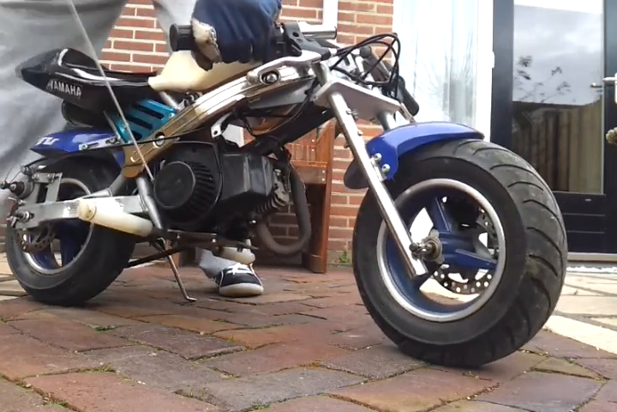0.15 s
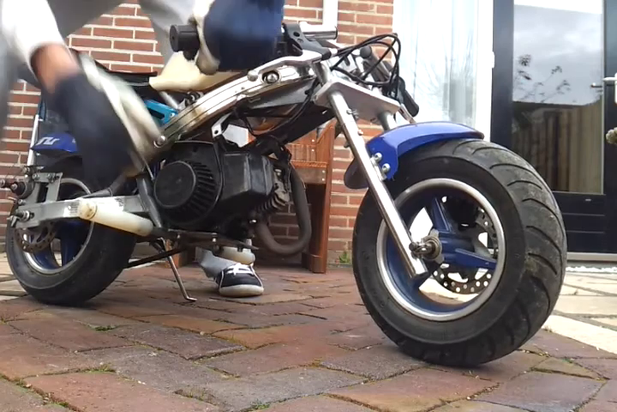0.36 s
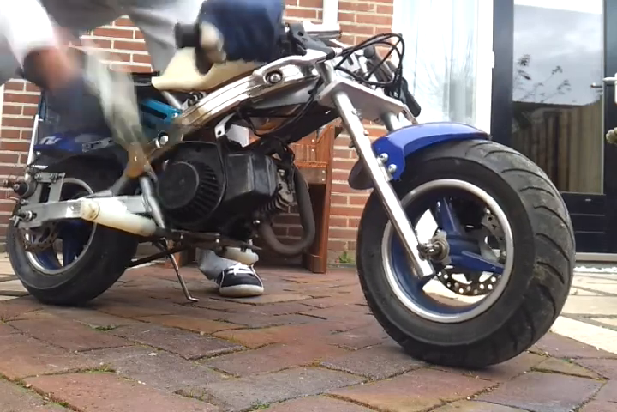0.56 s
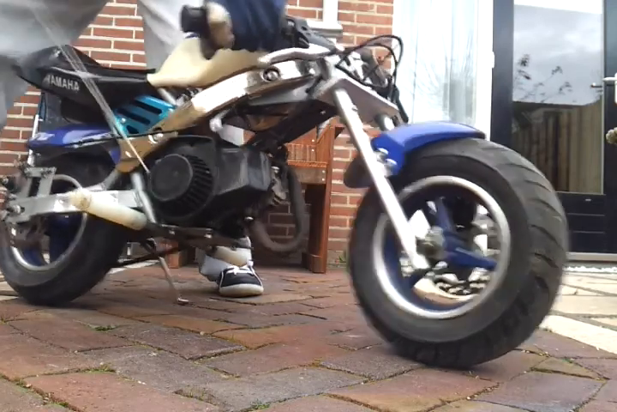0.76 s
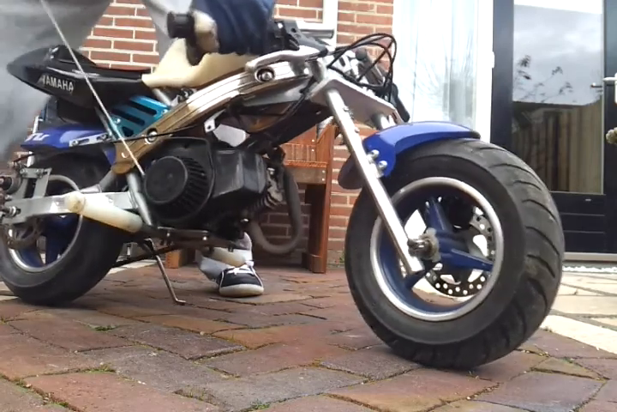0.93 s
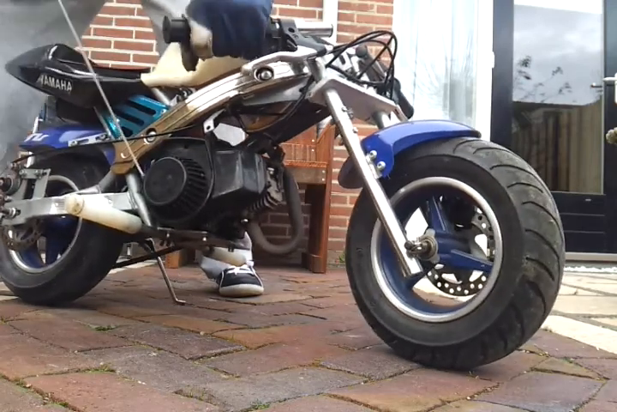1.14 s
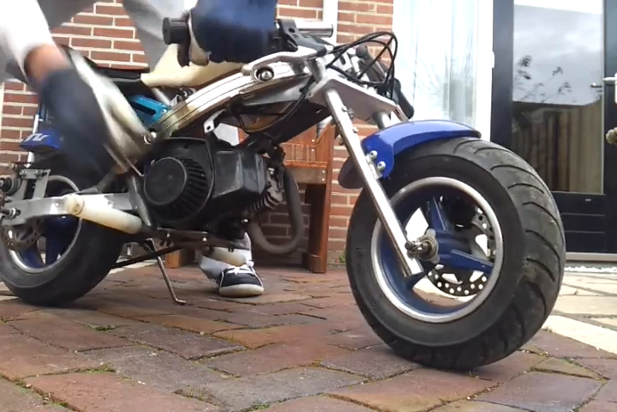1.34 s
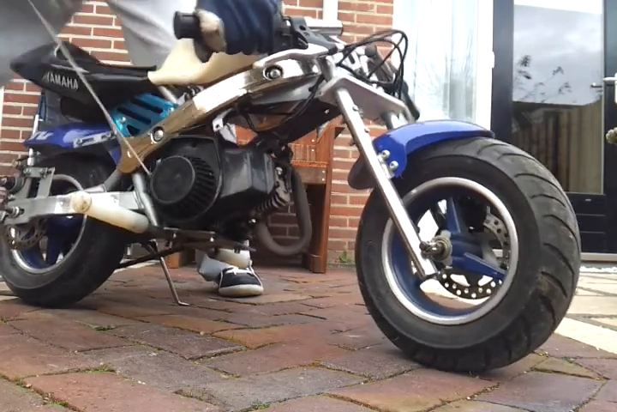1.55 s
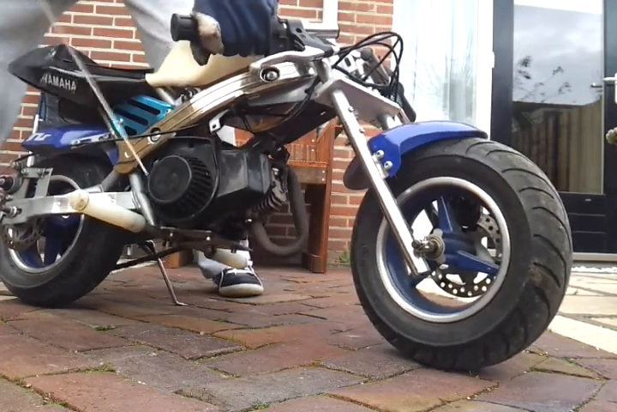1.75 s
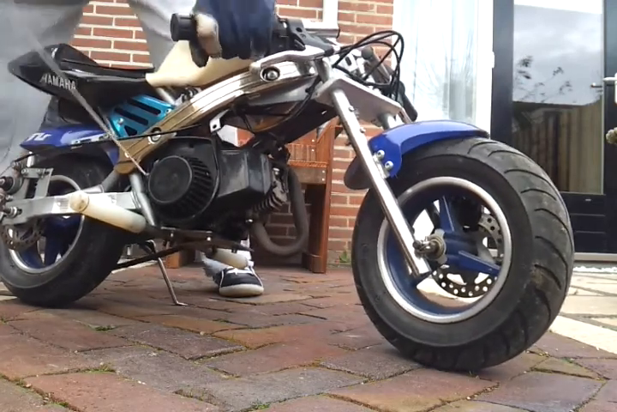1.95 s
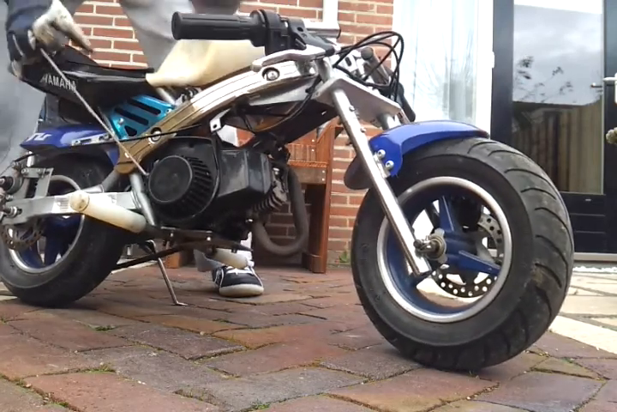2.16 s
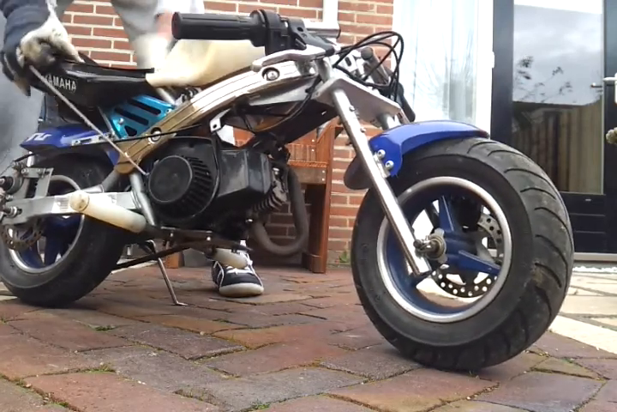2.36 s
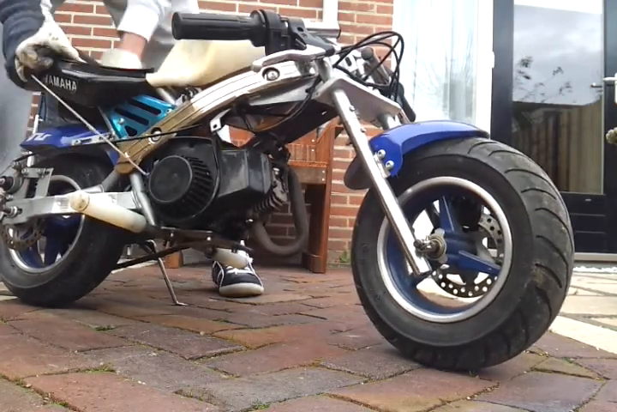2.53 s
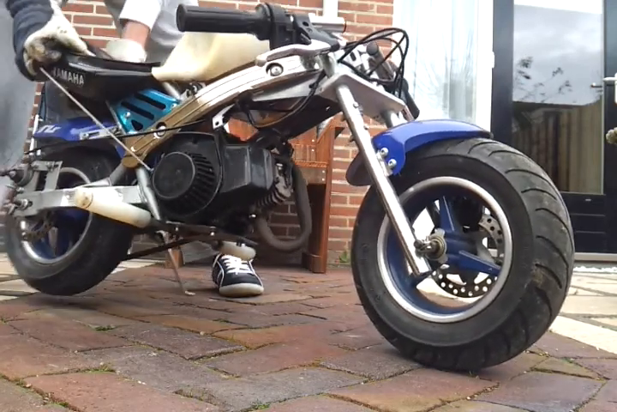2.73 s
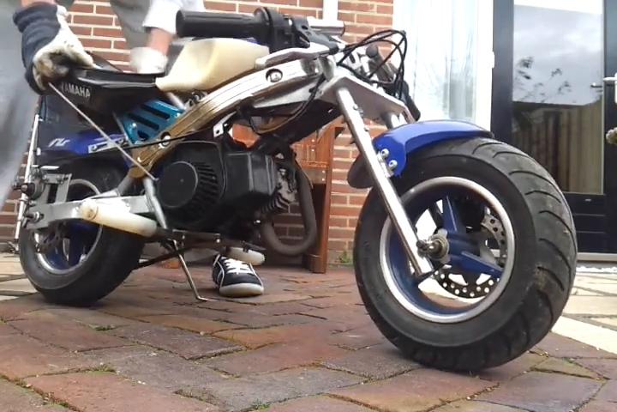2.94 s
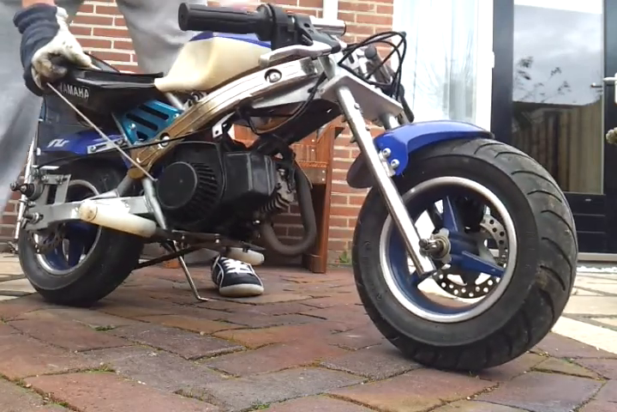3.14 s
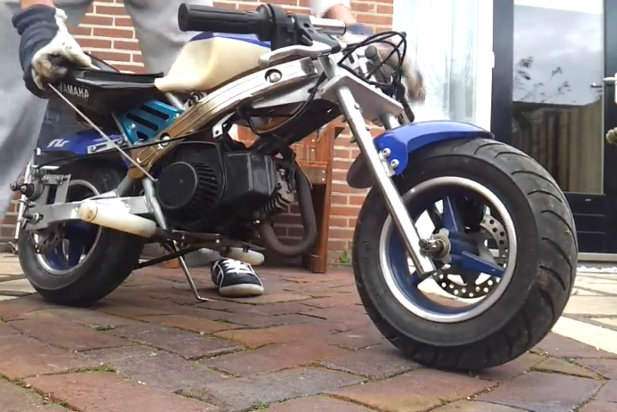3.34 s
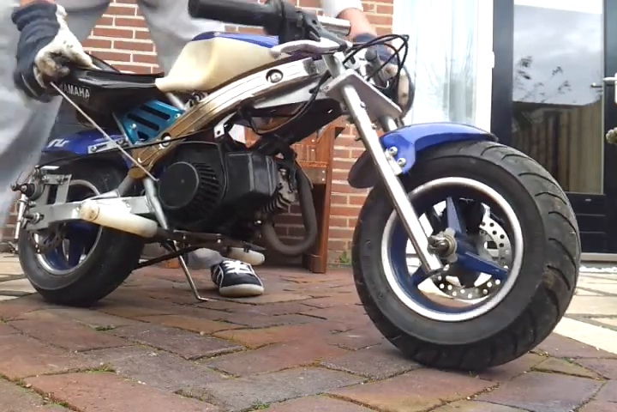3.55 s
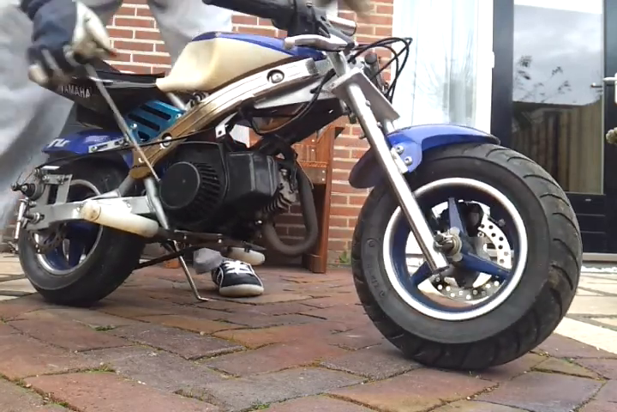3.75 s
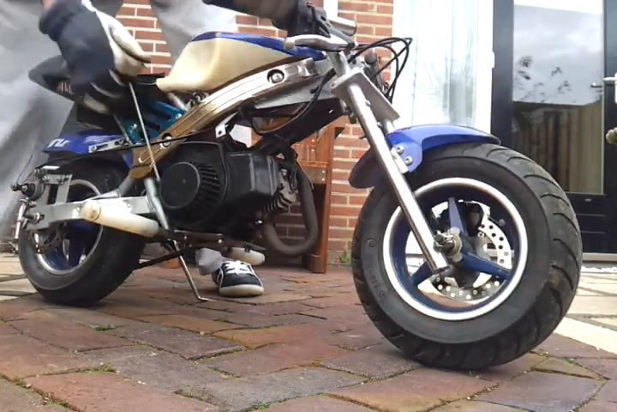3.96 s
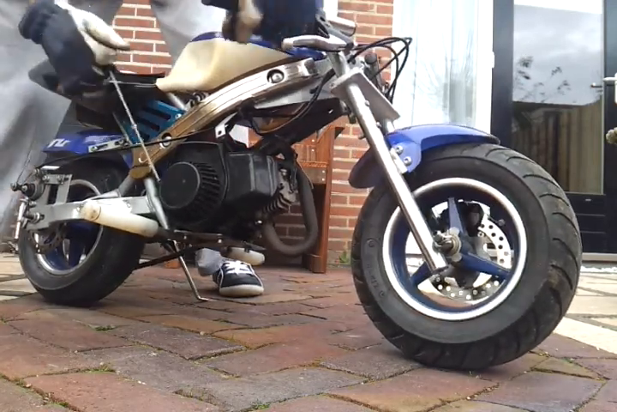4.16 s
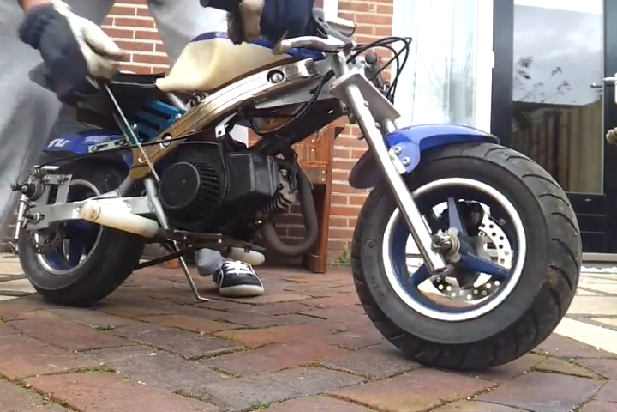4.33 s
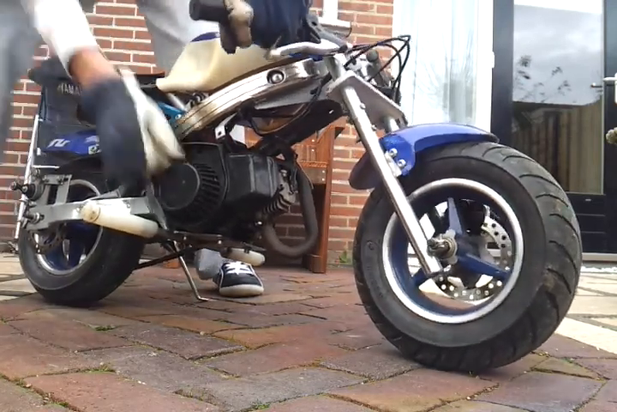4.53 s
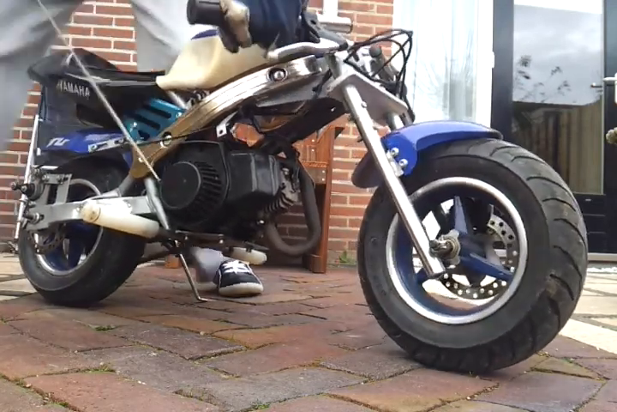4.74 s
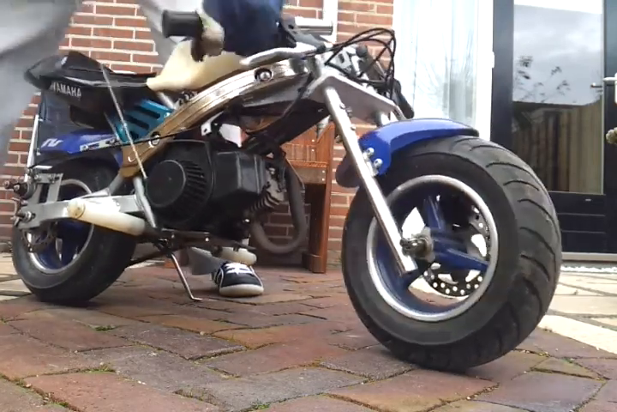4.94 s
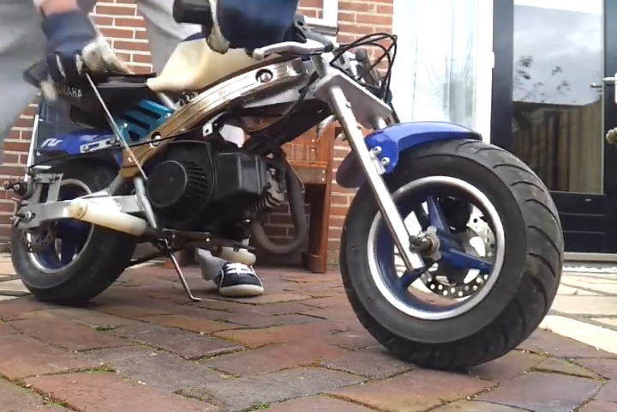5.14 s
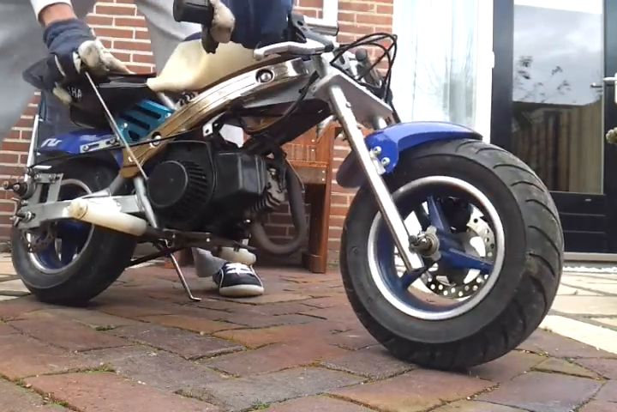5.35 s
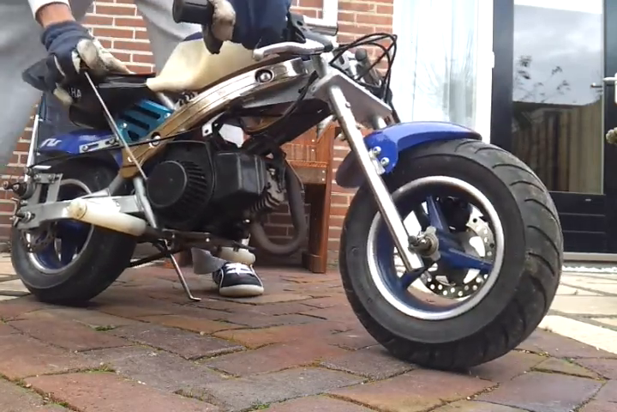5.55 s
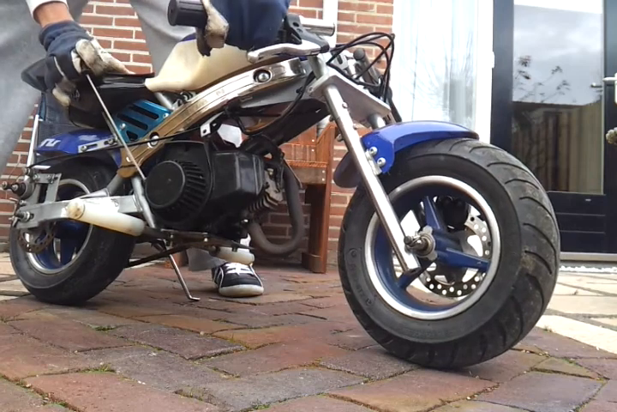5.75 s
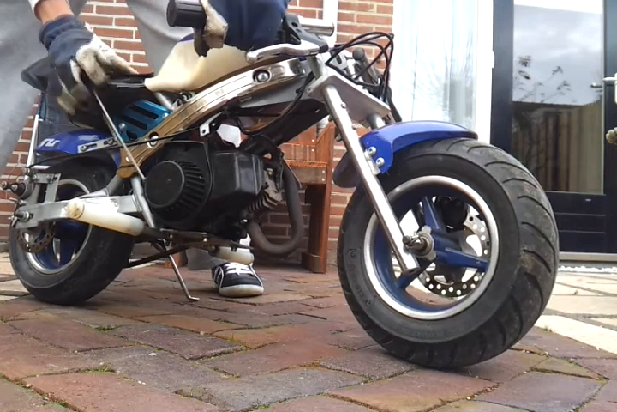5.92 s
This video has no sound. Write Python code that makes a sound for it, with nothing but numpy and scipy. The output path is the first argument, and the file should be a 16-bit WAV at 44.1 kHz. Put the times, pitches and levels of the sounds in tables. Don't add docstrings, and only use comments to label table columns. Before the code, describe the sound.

A small camera microphone sits about a metre from a tiny two-stroke motorbike on a brick patio, with short wall echoes and faint town hum. At 0 s a starter pull is already ending: hollow exhaust puffs slow and die by 0.26 s, with casing ticks and a rubbing whirr. Plastic and ratchet clacks follow around 0.45-0.65 s. A second, stronger pull runs 0.65-1.1 s, about thirty chuffs a second, with raspy whirr and thin squeaks, then a clack at 1.22 s. Handle clacks at 1.45 s lead to a third pull, 1.55-2.0 s, slowing out. From 2.1 to 4.4 s it is quiet: light taps, glove rubs, a sharper panel knock at 2.74 s and small puffs of wind near 3.2 s. Clicks gather from 4.4 s; at 4.7 s pawls snap and squeak and the engine catches, loud, ragged and distorted, briefly coasting lower around 5.15-5.5 s, then firing again, buzzing to the cut at 6 s.

```python
import sys
import numpy as np
from scipy import signal
from scipy.fft import rfft, irfft, next_fast_len
from scipy.io import wavfile
from scipy.ndimage import uniform_filter1d

SR = 44100
rng = np.random.default_rng(int(sys.argv[2]) if len(sys.argv) > 2 else 0)


def log_audio(samples):
    frames = np.atleast_2d(samples).T
    limited = np.clip(frames, -1, 1)
    pcm = np.round(limited * 32767).astype(np.int16)
    wavfile.write(sys.argv[1], SR, pcm)


def level_to_linear(level):
    exponent = np.asarray(level, float) / 20
    return 10 ** exponent


N = 264159
T = np.arange(N) / SR

# (time [s], frequency [Hz], level [dB])
INTAKE = [(4.75, 530, -8), (5.1, 500, -6), (5.16, 468, 4), (5.23, 440, 0), (5.27, 450, -6), (5.315, 455, 3),
          (5.36, 350, -1), (5.45, 275, 2), (5.52, 260, 1), (5.58, 280, -4), (5.85, 280, -4), (6, 275, -6)]


def evened(x):
    return x / np.sqrt(np.mean(x ** 2) + 1e-20)


def coloured(x, points):
    f, db = np.transpose(points)
    size = next_fast_len(len(x))
    hz = np.fft.rfftfreq(size, 1 / SR)
    gain = level_to_linear(np.interp(np.log(hz + 1), np.log(f), db))
    return irfft(rfft(x, size) * gain, size)[:len(x)]


def ring(x, modes):
    out = 0
    for hz, width_hz, db in modes:
        pole = np.exp((2j * np.pi * hz - np.pi * width_hz) / SR)
        out = out + level_to_linear(db) * signal.lfilter([1], [1, -pole], x).imag
    return out


def sweep(x, hz, width_hz):
    turn = np.exp(2j * np.pi * np.cumsum(hz) / SR)
    return (turn * signal.lfilter([1], [1, -np.exp(-np.pi * width_hz / SR)], x / turn)).imag


def add(mix, s, sound):
    part = mix[max(round(s * SR), 0):][:len(sound)]
    part += sound[:len(part)]


def clicks(times, db):
    at = np.clip(np.round(np.asarray(times) * SR).astype(int), 0, N - 1)
    return np.bincount(at, level_to_linear(db), N)


def soft(x, width_s):
    push = np.hanning(int(width_s * SR) + 3)
    return signal.oaconvolve(x, push / push.sum())[:len(x)]


def fading_noise(hits, decay_s):
    return signal.lfilter([1], [1, -np.exp(-1 / (decay_s * SR))], hits) * rng.standard_normal(N)


def curve(points):
    return level_to_linear(np.interp(T, *np.transpose(points), left=-120))


def gesture(start, stop, rise_s, fall_db_per_s):
    return np.clip((T - start) / rise_s, 0, 1) ** 2 * level_to_linear(-fall_db_per_s * np.maximum(T - stop, 0))


def pipe(flow, modes, low_hz=110):
    return signal.sosfilt(signal.butter(3, low_hz, "high", fs=SR, output="sos"), ring(flow, modes))


def cranking():
    # (time [s], level [dB])
    strokes = [(0.002, -5.5), (0.053, -7.5), (0.117, -13), (0.167, -19.5), (0.2099, -23), (0.258, -43),
               (0.7082, 2), (0.74, -2.5), (0.768, -1.5), (0.798, -1), (0.8283, -3.5), (0.856, -2),
               (0.898, -1), (0.947, -8), (1.011, -7.5), (1.047, -28), (1.09, -16), (1.108, -24.5),
               (1.593, -20), (1.616, -2), (1.645, -1), (1.678, 0.5), (1.711, -2), (1.749, -3.5),
               (1.796, -4.5), (1.851, -6.5), (1.867, -17), (1.929, -11.5), (1.991, -34), (2.063, -49)]
    # (frequency [Hz], width [Hz], level [dB])
    pipe_modes = [(140, 64, -19), (262.3, 67, -0.5), (367, 41, -9.5), (480, 35, -5.5), (537, 26, -8.5),
                  (770, 51, -6.5), (940, 55, -11.5), (1364, 86, -3)]
    # (time [s], level [dB])
    pings = [(.004, -14.5), (0.051, -15), (.199, -21.5), (0.7147, -15.5), (0.7467, -11.5), (0.779, -10.5),
             (0.806, -11.5), (0.9057, -3.5), (0.9553, -11), (1.625, -5.5), (1.654, -15), (1.685, -22),
             (1.7202, -14), (1.759, -15), (1.8084, -10), (1.866, -14.5), (1.021, -19), (1.109, -36),
             (1.943, -24)]
    # (frequency [Hz], width [Hz], level [dB])
    cold_can = [(2520, 170, 2), (1380, 200, 0), (2230, 150, -5), (900, 200, -4)]
    port_lag_s = 0.00097
    rebound_s, rebound_db = 0.01092, -16
    s, db = np.transpose(strokes)
    puffs = fading_noise(clicks(s, db - 11), 0.021)
    slugs = soft(clicks(s + port_lag_s, db) + clicks(s + rebound_s, db + rebound_db), 0.0027)
    blown = -pipe(-slugs + 0.081 * soft(puffs, 0.00038), pipe_modes, low_hz=165)
    sigh = soft(clicks(s, -13.5 + 0.32 * db), 0.0059)
    taps = np.diff(soft(clicks(*np.transpose(pings)), .0003), prepend=0)
    return blown + 3 * pipe(sigh, pipe_modes) + level_to_linear(10.5) * ring(taps, cold_can)


def crank():
    # (time [s], gain [turns/s])
    kicks = [(4.72, 80), (4.76, 8), (4.8, 10), (4.84, 12), (4.883, 5.5), (4.927, 3), (5.009, 8), (5.05, 8),
             (5.122, 3), (5.198, 3), (5.267, 13), (5.404, 11), (5.523, 3), (5.592, 9), (5.662, 8),
             (5.751, 13.5), (5.836, 9), (5.905, 9), (5.975, 9)]
    drag_turns_per_s2 = 130
    s, kick = np.transpose(kicks)
    speed = np.cumsum(np.bincount((s * SR).astype(int), kick, N))
    speed = speed - drag_turns_per_s2 * np.maximum(T - s[0], 0)
    return np.cumsum(speed) / SR, speed


def engine():
    # (time [s], level [dB])
    pumping = [(4.735, -49.5), (4.76, -7), (4.9, -5.5), (5.1, -4), (5.3, -5.5), (5.5, -4.5), (5.7, -6.5),
               (6, -2)]
    # (frequency [Hz], width [Hz], level [dB])
    fast_pipe = [(373, 650, 7), (277.7, 56, -6.5), (479, 56, -9), (535, 41, -6), (983, 250, -26.5),
                 (1390, 100, -10)]
    turns, speed = crank()
    level = curve(pumping)
    uneven = level_to_linear(2 * rng.standard_normal(N)) * level
    beat = (np.diff(np.floor(turns), prepend=0) > 0) * uneven
    gulp = (np.diff(np.floor(turns + .47), prepend=0) > 0) * uneven
    gas = level * (1.0 + np.exp(-(turns % 1) / 0.93)) * rng.standard_normal(N)
    flow = -soft(beat + 0.096 * gulp, 0.00082) + .016 * soft(gas, 0.00046)
    exhaust = pipe(flow, fast_pipe, low_hz=189)
    return exhaust + firings(gas) + intake(level * (gulp != 0)) + cylinder(beat, gas) + drone(turns, speed)


def firings(gas):
    # (time [s], can ping level [dB], pipe ring level [dB])
    lit = [(4.7611, -0.5, -19.5), (4.7994, -14, -10.5), (4.8384, -8.5, -12), (4.8818, -6, 8.5),
           (4.9267, -5.5, -10), (4.9716, -5.5, -17), (5.009, -4, -3.5), (5.0499, -16.5, -3.5),
           (5.099, -22, -8), (5.1218, -8, -8), (5.142, -10, -16), (5.1976, -11.5, -12.5), (5.2669, -1, -3),
           (5.3328, -17.5, -16.5), (5.4041, -2, -3.5), (5.5233, 1, -9.5), (5.5917, 1, -17.5),
           (5.662, -6, -9.5), (5.7089, -10.5, -16.5), (5.7508, -7.5, -5.5), (5.84, -2, -12.5),
           (5.9045, -9.5, -6.5), (5.9738, -3.5, -15)]
    # (frequency [Hz], width [Hz], level [dB])
    hot_pipe = [(745, 46.8, -15.5)]
    # (time [s], level [dB])
    header_rings = [(4.855, -16), (4.895, -12.5), (5.045, -17), (5.2, -16.5), (5.365, -38), (5.45, -19),
                    (5.535, -15), (5.63, -13), (5.685, -14.5), (5.718, -9.5), (5.87, -14), (5.935, -17),
                    (5.965, -23.5)]
    # (frequency [Hz], width [Hz], level [dB])
    header = [(544.2, 48, -14)]
    # (frequency [Hz], width [Hz], level [dB])
    can = [(2559, 64, -3), (2266, 170, 0.5)]
    s, ping_db, ring_db = np.transpose(lit)
    flame = fading_noise(clicks(s, ring_db), 0.0023)
    push = clicks(s, np.minimum(ring_db, -6) - 0.5) + .006 * flame + 0.003 * gas
    hot = ring(ring(push, hot_pipe), hot_pipe)
    bend = ring(ring(clicks(*np.transpose(header_rings)), header), header)
    rasp = fading_noise(clicks(s, ping_db), .009)
    return hot + bend + ring(clicks(s, ping_db + 4.5) + 0.077 * rasp, can)


def intake(gulps):
    s, hz, db = np.transpose(INTAKE)
    gulps = soft(gulps, 0.00021)
    gulps = gulps - uniform_filter1d(gulps, size=301)
    return level_to_linear(np.interp(T, s, db - 2.5)) * sweep(gulps, np.interp(T, s, hz), 120)


def cylinder(beat, gas):
    # (frequency [Hz], width [Hz], level [dB])
    fins = [(5940, 60, -7.5), (6230, 34, 3), (6290, 80, 0.5), (6550, 50, -0.5), (3900, 43, -8)]
    # (time [s], level [dB])
    skirt = [
        (4.75, -15),
        (5.05, -11),
        (5.15, -3),
        (5.5, -3),
        (5.6, -7),
        (5.85, -4),
        (6, -8),
    ]
    # (frequency [Hz], width [Hz], level [dB])
    bore = [(5290, 120, 0), (6200, 200, -5)]
    shaken = ring(level_to_linear(-23.5) * gas * 0.043 + level_to_linear(-9.5) * beat, fins)
    return shaken + ring(curve(skirt) * (beat != 0), bore)


def drone(turns, speed):
    # (time [s], level [dB])
    strength = [
        (4.74, -57),
        (4.8, -20),
        (5.05, -25.5),
        (5.15, -16.5),
        (5.5, -21.5),
        (5.58, -20),
        (6, -23),
    ]
    # (multiple of shaft speed, level [dB])
    orders_db = [(2, -14.5), (3, -1), (4, -1.5), (5, -2), (6, -1.5), (7, -3.5), (8, -3.5)]
    pick_hz, patchy_db, patch_s = 42, 2.5, .05
    s, hz, db = np.transpose(INTAKE)
    note_hz, lift_db = np.interp(T, s, hz), np.interp(T, s, db + 7)
    out = np.zeros(N)
    for k, order_db in orders_db:
        lift = lift_db / (1 + ((k * speed - note_hz) / pick_hz) ** 2)
        patchy = patchy_db * evened(soft(rng.standard_normal(N), patch_s))
        out += level_to_linear(order_db + lift + patchy) * np.cos(2 * np.pi * (k * turns + rng.random()))
    return curve(strength) * out


def effort():
    # (time [s], hiss level [dB])
    fan = [
        (4.655, -32),
        (4.7, -19.5),
        (4.78, -4),
        (4.95, -5.5),
        (6, -11),
    ]
    # (pawls grab [s], rope let go [s], hiss level [dB])
    pulls = [
        (-.3, -0.021, -12),
        (0.653, 0.943, -13.5),
        (1.547, 1.795, -15),
    ]
    # (start [s], hold [s], hiss level [dB], casing rattle re hiss [dB])
    rubs = [(0.147, 0.13, -39.5, -9), (0.288, 0.74, -46, -4), (0.457, 0.031, -33.5, -5),
            (0.621, 0.031, -26.5, -0.5), (1.189, 0.76, -45.5, -2), (1.205, 0.014, -52, 20.5),
            (1.442, 0.22, -33.5, -1), (2.044, 0.072, -55.5, 14.5), (2.165, 0.38, -56.5, -18),
            (2.605, .012, -48.5, 3.5), (2.683, 0.1, -53, 11.5), (2.733, 0.012, -25, -21),
            (2.815, 0.09, -70.5, 21), (2.944, 0.047, -35, 1.5), (2.988, 0.11, -60, 14.5),
            (3.445, 0.022, -46, -21), (3.649, 0.12, -53.5, 1.5), (4.12, 0.2, -58.5, 6.5),
            (4.407, 0.041, -61, 19), (4.467, 0.087, -58, -12), (4.552, 0.11, -50, -4),
            (4.595, 0.038, -56, 9)]
    grab_s, sag_db_per_s, let_go_db_per_s = 0.0024, 5.5, 484
    coast_db, coast_db_per_s, coast_s = -14, 62, 0.24
    rub_rise_s, rub_fall_db_per_s = 0.0084, 260.5
    hiss = curve(fan)
    rattle = hiss * level_to_linear(-6.5)
    for grab, go, db in pulls:
        pull = level_to_linear(db - sag_db_per_s * (T - grab)) * gesture(grab, go, grab_s, let_go_db_per_s)
        coast = level_to_linear(db + coast_db) * gesture(go, go, grab_s, coast_db_per_s)
        coast = coast * gesture(go, go + coast_s, grab_s, rub_fall_db_per_s)
        built = level_to_linear(-6.5 - 14.5 * np.exp(-np.maximum(T - grab, 0) / 0.023))
        hiss = hiss + pull + coast
        rattle = rattle + built * pull + level_to_linear(1) * coast
    for s, hold, db, rattle_db in rubs:
        rub = level_to_linear(db) * gesture(s, s + hold, rub_rise_s, rub_fall_db_per_s)
        hiss, rattle = hiss + rub, rattle + level_to_linear(rattle_db) * rub
    return hiss, rattle


def whirr():
    # (frequency [Hz], density [dB/Hz])
    hiss_colour = [(880, -17.5), (1500, -1.5), (1960, -6.5), (2400, -3.5), (2550, -3), (3130, -6),
                   (4870, -5), (5600, 0), (6260, 2.5), (7100, -9), (8000, 5), (10400, -73.5), (17600, -120)]
    rattle_colour = [(200, -4.5), (450, 0.0), (1000, 0), (2000, -9.5), (3000, -12.0)]
    hiss_gain, rattle_gain = effort()
    grains_per_s = 2500
    height = level_to_linear(2.0 * np.minimum(rng.exponential(1, N), 4))
    grains = height * (rng.random(N) < grains_per_s / SR) * rng.standard_normal(N)
    flicker = level_to_linear(2.14 * evened(soft(rng.standard_normal(N), 0.011)))
    scrape = (evened(grains) + 0.89 * rng.standard_normal(N)) * flicker
    hiss = evened(coloured(scrape, [(900, -47.0)] + hiss_colour))
    rattle = evened(coloured(rng.standard_normal(N) * flicker, rattle_colour))
    return level_to_linear(-0.5) * hiss_gain * hiss + level_to_linear(2.0) * rattle_gain * rattle


def squeaks():
    # (time [s], level [dB], frequency [Hz], length [s], glide [Hz/s])
    slips = [(0.138, -14.5, 6130, 0.0091, 4), (0.659, -13, 6500, 0.057, 6999),
             (1.091, -28.5, 6170, 0.014, -9), (1.141, -26, 6320, 0.02, -2000),
             (1.565, -13, 6960, 0.058, -4000), (1.744, -15, 6650, 0.036, -7000),
             (1.747, -16.5, 4250, 0.02, 4007), (1.965, -22.5, 6120, 0.021, 3),
             (4.707, -11.5, 6590, 0.059, 0), (2.988, -34, 2600, 0.011, 0), (3.464, -41.5, 2330, 0.015, 0),
             (0.836, -10.5, 5380, 0.025, -0.5), (0.843, -20, 3785, 0.029, 0.5),
             (1.56, -21, 4260, 0.024, -2), (0.111, -20, 6180, 0.015, 5), (3.729, -43, 6290, 0.018, -3),
             (4.194, -58, 2950, .015, 0)]
    out = np.zeros(N)
    for s, db, hz, length_s, glide in slips:
        t = T[:int(3 * length_s * SR)]
        noise, drift = rng.standard_normal((2, 9000))
        wobble = 1 + .015 * evened(soft(drift, 0.015))
        pitch = (hz + glide * np.clip(T[:9000] - T[1000], 0, length_s)) * wobble
        whistle = sweep(noise, pitch, 45) + level_to_linear(5.5) * sweep(noise, pitch, 500)
        fuzz = evened(whistle[1000:1000 + len(t)])
        add(out, s, level_to_linear(db) * fuzz * np.minimum(t / 0.0013, 1) * np.exp(-(t / length_s) ** 2))
    return out


def knocks():
    # (time [s], level [dB], brightest frequency [Hz])
    casing = [(.0005, -19, 5930), (0.0495, -11, 4500), (.0605, -8.5, 5600), (0.1121, -12.5, 5640),
              (1.004, -10.5, 5300), (1.0085, -5, 6700), (1.027, -12, 6430), (1.0814, -9.5, 5420),
              (1.742, -6.5, 4240), (1.8062, -1, 5430), (1.851, -10, 2620), (1.9222, -10, 6140),
              (2.0527, -25, 5300), (2.1412, -30, 4860), (2.152, -24, 6100), (2.165, -41, 5000),
              (2.46, -39, 2930), (2.53, -46, 2600), (2.599, -29.5, 6050), (2.6964, -25, 2800),
              (2.9644, -11.5, 5300), (3.0253, -18, 6400), (3.0444, -16.5, 4000), (3.2031, -28, 5040),
              (3.205, -32, 2250), (3.3315, -34.5, 2320), (3.457, -33, 5750), (3.4665, -27.5, 6500),
              (4.1192, -34, 5700), (4.6001, -28, 6900)]
    cover = [(0.1568, -7, 3500), (.163, -12, 2270), (0.6555, 1, 6830), (1.2185, -6, 5850),
             (1.2215, -10.5, 3600), (.453, -33, 2490), (2.7388, -13, 3400), (3.466, -37.5, 2400),
             (4.6687, -10, 4170)]
    handle = [(0.4905, -8.5, 2700), (1.4536, -0.5, 5320), (1.4695, -6, 2860), (4.4047, -21, 4280),
              (4.6366, -24, 2520), (4.653, -21, 2500), (4.658, -15, 6400)]
    stop = [
        (1.2242, -14, 3750),
        (1.2345, -14, 2820),
        (2.7452, -13.5, 2760),
        (2.7615, -17, 2790),
    ]
    pawl = [(0.8345, 6.5, 5500), (1.5484, -4.5, 4300), (2.0892, -16.5, 5040), (3.0889, -19, 2220),
            (4.6786, 0, 6300), (4.696, -5, 5900)]
    lever = [(4.4294, -17, 4100), (0.41, -36, 2300), (2.0545, -33, 5600)]
    latch = [(4.4517, -16, 3360)]
    sprag = [
        (4.671, -15, 4300),
        (0.012, -18, 2600),
    ]
    tank = [(2.8565, -38, 5200), (2.8785, -31.5, 5300), (3.012, -28, 4530), (3.0645, -29.5, 4000),
            (3.7094, -38.5, 6300), (3.7245, -39, 6200), (4.147, -38, 1190), (3.603, -46, 3000),
            (3.679, -34.5, 1300), (3.691, -33.5, 1500), (3.762, -40, 2500), (3.777, -40, 1990),
            (4.157, -39, 2480), (4.173, -35, 2400), (4.205, -49, 2900), (4.237, -38.5, 1600),
            (4.279, -43, 2000), (.493, -38, 1100), (.51, -27, 1100), (1.245, -26, 3020), (2.76, -33, 2800)]
    seat = [(2.9522, -23, 3900), (3.035, -27, 4000)]
    ratchet = [(0.4655, -12.5, 6600), (0.5079, -8, 6300), (0.5085, -8, 2820), (0.554, -18, 6230),
               (0.626, -7, 3100), (.6385, -14, 5000), (1.2055, -31, 5500), (1.413, -22, 5100),
               (1.4185, -12, 6250), (1.4707, -4, 6360), (1.5253, -2.5, 4320), (2.385, -34, 2460),
               (3.6, -39, 5500), (4.254, -27, 4470), (4.2911, -26, 2970), (4.356, -26, 3220),
               (4.397, -33, 3600), (4.4047, -17.5, 3200)]
    # (knocks, hollow note [Hz], hollow level [dB], t60 [s], broad crack level [dB])
    struck = [(casing, 320, -17.5, 0.058, -5.5), (cover, 1050, -20.5, 0.093, -2),
              (handle, 870, -7.5, 0.03, -5), (stop, 1500, -19, 0.069, -10),
              (pawl, 1520, -24, 0.06, -11.5), (lever, 1410, -12, 0.047, -17),
              (latch, 1620, -14, 0.047, -18), (sprag, 1200, -18, .015, -22.5),
              (tank, 493, -1.3, 0.076, -9.5), (seat, 386, -2.2, 0.11, 6),
              (ratchet, 2500, -26.5, 0.015, -14)]
    out, t = np.zeros(N), T[:4500]
    for hits, low_hz, low_db, t60, crack_db in struck:
        fade = level_to_linear(-60 * t / (0.89 * t60))
        hollow_modes = [(low_hz, 2.53 / t60, -30), (1.8 * low_hz, 350, -36), (0.577 * low_hz, 90, -33)]
        for s, db, hz in hits:
            blow = rng.standard_normal(len(t)) * (0.6 * fade + 0.71 * level_to_linear(-60 * t / 0.00076))
            wide = ring(blow, [(hz, 500, -16), (0.655 * hz, 600, -15), (2700, 500, -29), (4500, 5000, crack_db)])
            wide = np.diff(wide, prepend=0)
            hollow = np.diff(ring(blow * fade, hollow_modes), prepend=0)
            both = wide / abs(wide).max() + level_to_linear(low_db + 5.5) * hollow / abs(hollow).max()
            add(out, s, level_to_linear(db - 0.35) * both)
    return out


def frame():
    # (time [s], level [dB], place from engine 0 to seat 1)
    blows = [
        (.491, -39, 0.18),
        (1.222, -34, 0.17),
        (1.454, -42, 0),
        (2.698, -43, 0.96),
        (2.745, -27, 0.75),
        (2.956, -59, 0.92),
        (4.453, -65.5, 0),
    ]
    # (frequency [Hz], level struck at engine [dB], level struck at seat [dB], t60 [s])
    tubes = [(1576, -20, -12, .7), (2250, -18, -8, 0.79), (2950, 0.5, -1, .2), (3870, -0.5, -13, 0.31),
             (3790, 3.5, -12, .7), (3300, -11.5, -21, .3), (3980, -8, -11, .35), (4230, -12, -19, 0.9),
             (4530, -3.5, -15, 0.32), (5300, -6, -17, .3)]
    out, t = np.zeros(N), T[:25000]
    for s, db, place in blows:
        for hz, near_db, far_db, t60 in tubes:
            share = 0.37 + 0.36 * rng.random()
            fade = level_to_linear(db + near_db + place * (far_db - near_db) - 60 * t / t60)
            add(out, s, share * fade * np.sin(2 * np.pi * hz * t))
    return out


def panels():
    # (time [s], level [dB], frequency [Hz], t60 [s])
    answers = [(.158, -22, 1200, .06), (.28, -34, 550, 0.096), (.4905, -11, 780, 0.017),
               (.4915, -18, 1630, 0.022), (.627, -26, 1500, .09), (.571, -33, 1100, 0.071),
               (1.2215, -15, 1030, 0.024), (1.232, -19.5, 970, 0.13), (1.25, -26, 1730, 0.069),
               (1.248, -36, 430, 0.13), (1.223, -22, 2840, .08), (1.4538, -7, 930, 0.024),
               (1.4545, -8, 1670, .025), (1.4545, -18, 560, .03), (1.465, -17.5, 900, .05),
               (1.527, -15, 2950, 0.033), (1.53, -17, 1500, .03), (2.6965, -33, 2500, .06),
               (2.743, -17, 1040, 0.057), (2.762, -29, 960, 0.15), (2.744, -14, 2330, 0.044),
               (2.746, -21.5, 2780, 0.11), (3.2035, -43, 2250, .04), (3.4655, -29, 2300, .025),
               (2.954, -27, 396, .05), (3.008, -30, 510, .06), (2.748, -29, 360, .1),
               (.002, -7, 300, 0.027), (4.356, -39, 1640, 0.045), (4.254, -38, 650, .04),
               (4.28, -46, 540, .05), (4.4055, -30, 1020, .04), (4.637, -18.5, 915, 0.021),
               (4.6375, -26, 1500, .03), (4.652, -28, 1000, 0.025), (4.67, -14.5, 3200, 0.016),
               (4.682, -13, 3300, 0.019), (4.695, -7.5, 3200, .02), (4.705, -10, 3280, .02),
               (4.704, -11.5, 1130, 0.032), (4.703, -13, 1450, 0.091)]
    out, t = np.zeros(N), T[:9000]
    for s, db, hz, t60 in answers:
        add(out, s, level_to_linear(db - 60 * t / t60) * np.minimum(t / .0008, 1) * np.sin(2 * np.pi * hz * t))
    return out


def patio(x):
    # (delay [s], level [dB])
    walls = [(.0031, -30), (.0057, -43), (.0094, -1.5), (.014, -2), (.021, -42.5), (.029, -2.5)]
    tail_t60_s, tail_db = .2, -18
    taps = np.zeros(SR // 2)
    at = np.arange(900, SR // 2 - 20, 20) + rng.integers(0, 20, (SR // 2 - 901) // 20)
    taps[at] = rng.choice([-1., 1.], len(at)) * level_to_linear(-60 * at / SR / tail_t60_s)
    taps *= level_to_linear(tail_db) / np.linalg.norm(taps)
    for k, (s, db) in enumerate(walls):
        taps[round(s * SR)] += (-1) ** k * level_to_linear(db - 15.5)
    return signal.oaconvolve(x, taps)[:N]


def air():
    # (frequency [Hz], density [dB/Hz])
    hum = [(15, -44.5), (25, -11.5), (101, -7.5), (142, -10.5), (421, -13), (619, -19), (789, -16),
           (1750, -24), (2070, -28.5), (2450, -30.5), (5570, -28), (8000, -38.5), (10400, -68.5),
           (17600, -120)]
    # (time [s], level [dB], frequency [Hz])
    gusts = [
        (3.132, -35, 59),
        (3.15, -34, 55),
        (3.205, -32, 60),
        (3.231, -26, 139),
    ]
    drift = level_to_linear(0.24 * evened(soft(rng.standard_normal(N), 0.1)))
    out = level_to_linear(-50.5) * evened(coloured(rng.standard_normal(N), hum)) * drift
    for s, db, hz in gusts:
        u = T[:int(SR / hz)] * hz
        add(out, s, -level_to_linear(db) * np.sin(2 * np.pi * u) * np.sin(np.pi * u))
    return out


def scene():
    bike = cranking() + engine() + squeaks() + knocks() + frame() + panels()
    return (bike + patio(bike) + whirr() + air())[None]


def top_cut(x):
    return signal.sosfilt(signal.butter(12, 15900, fs=SR, output="sos"), x)


def record(dry):
    # (frequency [Hz], gain [dB])
    band = [(7000, 1.5), (7400, -6), (7800, -25.5), (8200, -25.5), (8900, -21.5), (9400, -100)]
    top, ceiling = .71, .75
    hot = dry[0] / (1 + abs(dry[0] / top) ** 9.53) ** (1 / 5.27)
    mix = np.clip(coloured(hot, band), -ceiling, ceiling)[None]
    return top_cut(mix)


dry = scene()
out = record(dry)
log_audio(out)
```